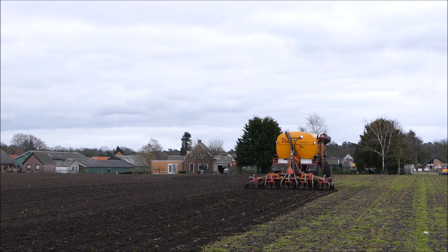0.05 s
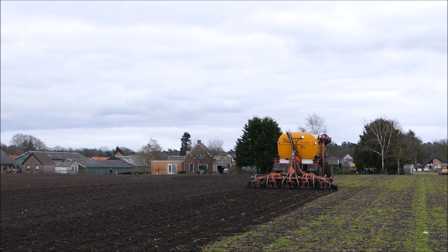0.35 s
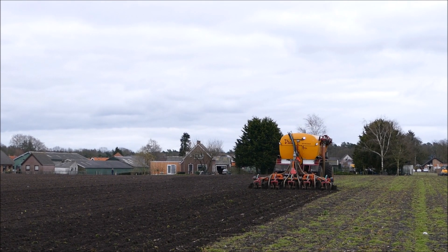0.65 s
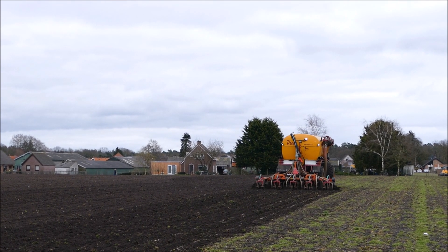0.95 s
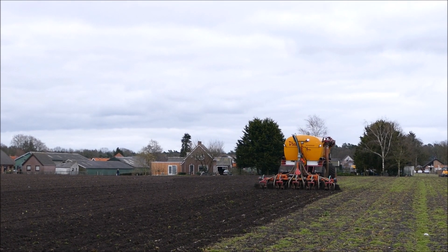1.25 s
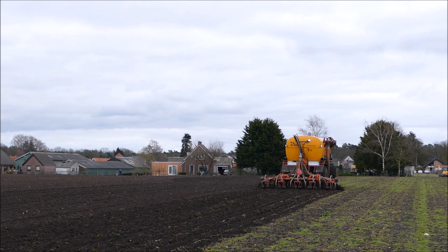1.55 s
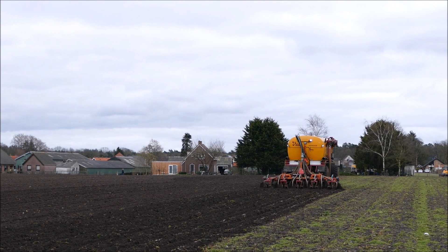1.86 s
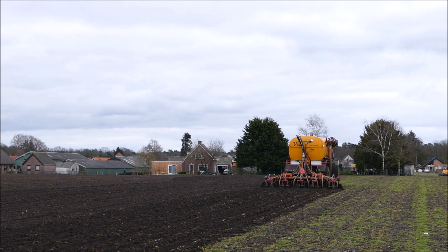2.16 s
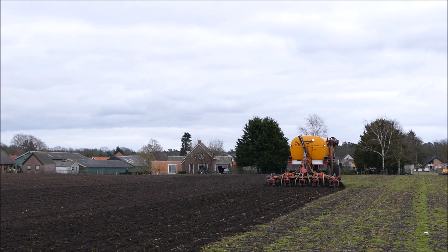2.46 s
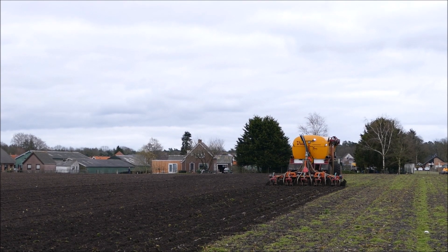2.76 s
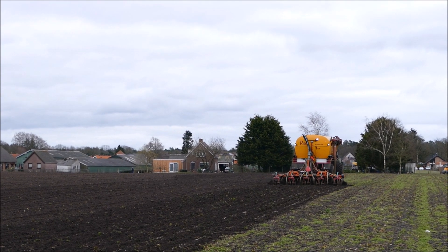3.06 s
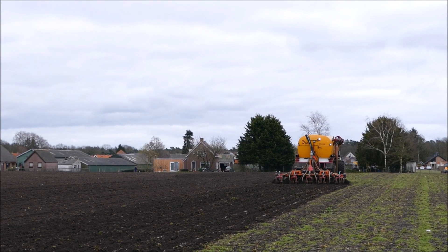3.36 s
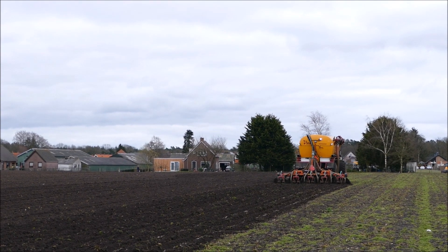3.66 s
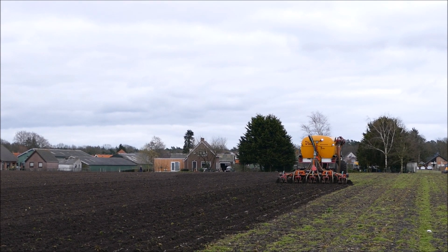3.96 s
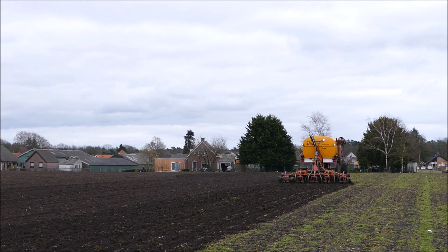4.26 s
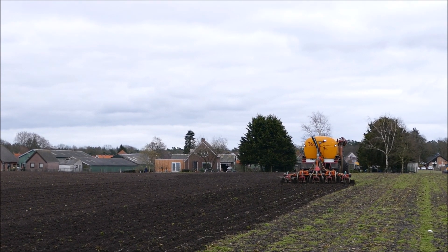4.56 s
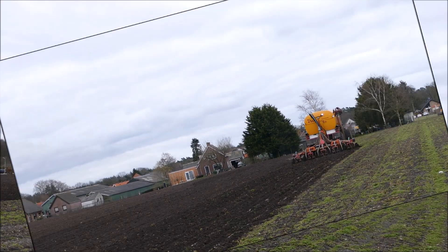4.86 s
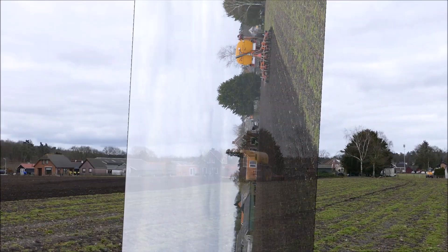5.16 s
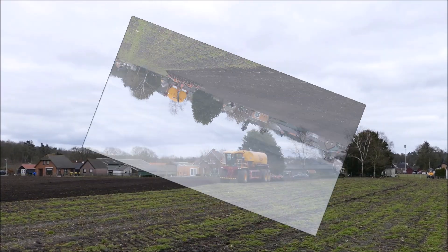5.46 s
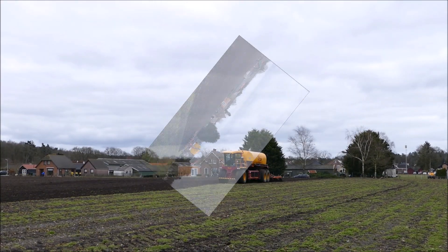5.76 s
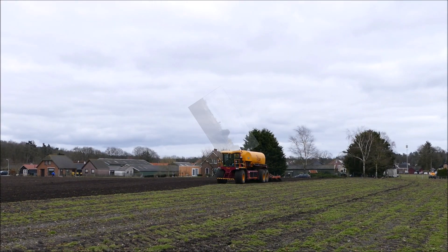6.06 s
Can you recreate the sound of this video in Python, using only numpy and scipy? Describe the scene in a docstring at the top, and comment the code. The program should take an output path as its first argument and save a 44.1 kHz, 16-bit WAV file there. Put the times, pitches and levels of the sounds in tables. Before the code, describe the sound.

A large diesel field machine moves away with a fluttering rush and hiss, then is heard approaching far off, squeaking.

```python
"""Slurry tanker working a field.

A self-propelled tanker crawls away, a little right of the microphone. Its six-cylinder diesel drones
under the fluttering rush of the cooling fan, and the injector tines hiss through the soil. With the
machine far off, the sound drops out for an instant, then fades over to it coming back, front on: the
hydraulic pumps whine and a turning part catches in short squeals. Light air stirs at the microphone."""
import sys
import numpy as np
from scipy.fft import rfft, irfft, next_fast_len
from scipy.io import wavfile
from scipy.ndimage import map_coordinates

SR = 44100
rng = np.random.default_rng(int(sys.argv[2]) if len(sys.argv) > 2 else 0)


def store_wav(level_fs):
    """Save 16-bit WAV to argv[1]."""
    pcm = np.round(np.clip(np.atleast_2d(level_fs), -1, 1) * 32767)
    wavfile.write(sys.argv[1], SR, pcm.T.astype(np.int16))


N = 273420

# Levels are relative. "Away" is the machine heard from behind, "back" is its return, front on.
# engine speed: t/s, firing rate/Hz
FIRING_RATE = [(0, 91.3), (.75, 91.6), (1.35, 91.3), (1.6, 90.05), (3, 89.9), (4.5, 89.6), (6.2, 89.7)]
# exhaust drone going away: t/s, level/dB
DRONE_AWAY = [(0, -38), (2.1, -40), (3.1, -43), (3.95, -44.5), (4.2, -49), (4.45, -47.5), (4.8, -53)]
# exhaust partials: multiples of the four-stroke cycle
EXHAUST_ORDERS = (9, 10, 11, 12, 14, 15, 16, 17, 18, 19, 21.5, 24, 25, 28, 30)
# the same partials: away level/dB, back level/dB
EXHAUST_LEVELS = [(-18.5, -16.5), (-40, -24), (-5, -13.5), (0, -1), (-13, -16), (-12.5, -28), (-19.5, -24),
                  (-10.5, -22), (-16.5, -22), (-36, -18.5), (-18.5, -24), (-24, -25), (-16, -18.5),
                  (-20.5, -20.5), (-25, -23)]
# diesel rumble from behind and from the front: f/Hz, level/dB
REAR_RUMBLE = [(20, -30), (45, -22), (70, -13.5), (110, -5.5), (150, 1), (190, 2), (265, 0), (330, -0.5),
               (420, -10.5), (540, -10.5), (750, -14.5), (1200, -53)]
FRONT_RUMBLE = [(60, -27), (110, -18), (150, -13), (200, -7), (300, -3), (360, -4.5), (440, -4.5),
                (520, -15), (680, -2.5), (820, -7), (1100, -23)]
# firing thud, rumble, fan roar and one pump tone, each sinking: level/dB, held until t/s, fall/(dB/s)
THUD_AWAY = (-48, 0.95, 3.35)
RUMBLE_AWAY = (-41, 1.44, 4.12)
ROAR_AWAY = (-33, 0.05, 3.61)
STRAIN_AWAY = (-53, 1.3, 15)

# fan going away: t/s, rush level/dB, hiss level/dB
FAN_AWAY = [(0, -27, -35), (0.5, -29, -35), (0.8, -27.5, -36), (1.1, -29, -33.5), (1.32, -28, -35),
            (1.95, -31, -34.5), (2.55, -35, -37.5), (3, -36, -41.5), (3.38, -39, -45), (3.75, -41.7, -47),
            (4.3, -43, -48), (4.9, -46, -53), (5.5, -48.5, -54)]
# low, middle and high bands of the fan's air noise: f/Hz, level/dB
ROAR_SPECTRUM = [(300, -15), (480, -7.5), (650, -5.5), (950, -1.5), (1250, -0.5), (1600, -1), (2400, -46)]
RUSH_SPECTRUM = [(800, -33), (1300, -12), (1600, -4), (1800, 0.8), (1960, -2), (2170, 2.5), (2420, -0.5),
                 (2950, -3.5), (3210, -10.5), (3380, -5.5), (3600, -16.5), (4100, -16.5), (5200, -31)]
HISS_SPECTRUM = [(2400, -13), (3300, -1), (3900, 0.5), (4500, 0), (5000, -3.5), (5800, -7.5), (6600, -14),
                 (7800, -16), (10000, -22)]
# shading of the rush from the front: f/Hz, gain/dB
FRONT_SHADE = [(1200, -6), (1900, -1), (2400, -3.5), (2900, -2), (4000, 1)]
# brief surges of the rush: t/s, half-length/s, gain/dB
RUSH_SURGES = [(0.603, 0.015, 3), (0.772, 0.013, -0.5), (1.278, 0.011, 1.5), (2.172, 0.03, 0.5),
               (3.016, 0.045, 0.5), (3.51, 0.03, 1.5), (3.98, 0.031, 0.5)]
# metal resonances of the fan housing: f/Hz, width/Hz, boost/dB
HOUSING_MODES = [(2980, 240, 2.5), (3360, 110, 1), (3856, 170, 5), (4100, 100, 3), (4487, 150, 6),
                 (4990, 160, 7.5), (5486, 175, 7), (6010, 170, 7), (6480, 230, 6), (7020, 110, 2),
                 (7300, 100, 3), (7580, 94, 4)]
# first three harmonics of the blade tone: away level/dB, back level/dB
BLADE_LEVELS = [(-25.5, -23), (-6, -17), (-24, -32)]

# tines going away: t/s, level/dB
TINES_AWAY = [(0, -44.5), (0.9, -47), (2.3, -44), (2.7, -47), (3.15, -60), (4.2, -60.5), (5.1, -65.5)]
# steel scraping through soil: f/Hz, level/dB
SCRAPE_SPECTRUM = [(4500, -36), (6500, 1), (7600, -2), (8300, -1.5), (9500, 1.5), (10500, -1.5),
                   (11500, -8), (12500, -12), (14200, -25)]
# pump whine going away: t/s, level/dB
WHINE_AWAY = [(0, -44.5), (0.7, -51.5), (2, -53.5), (2.35, -48.5), (2.7, -55.5), (3.3, -55), (5.1, -63.5)]
# pump partials: multiples of the firing rate
PUMP_ORDERS = (3.983, 6.92, 7.965, 8.03, 8.46, 9, 13.16, 17.3, 27.87)
# the same partials: away level/dB, back level/dB
PUMP_LEVELS = [(-7.5, -7.5), (-12, -6.5), (-1, -1), (-11.5, -22), (-20, -14), (-26, -19), (-5, -21),
               (-25, -17), (-15, -13)]
# squeals from the front, about six a second: start t/s, crest t/s, end t/s, crest level/dB
SQUEALS = [(5.335, 5.38, 5.425, -48), (5.475, 5.55, 5.6, -46.5), (5.595, 5.695, 5.752, -47.3),
           (5.775, 5.865, 5.912, -46), (5.94, 6.025, 6.09, -47), (6.085, 6.175, 6.23, -47)]

# air at the microphone: f/Hz, level/dB
BREEZE_SPECTRUM = [(20, -12), (45, -5), (75, 2.5), (130, 7), (200, 2), (330, -12), (900, -25)]
# the machine's place in the stereo image: f/Hz, left minus right level/dB
BALANCE = [(350, 0), (680, -1), (1240, -3.5), (2270, -3), (4150, -2.5), (7600, -.5)]
# likeness of its noise on the two sides: f/Hz, correlation
COHERENCE = [(30, 0.61), (80, 0.81), (170, 0.97), (350, 0.94), (600, 0.69), (1200, 0.85), (2200, 0.99),
             (4500, 0.93), (9000, 0.77)]
# narrow dips in the recorder's response: f/Hz, width/Hz, depth (0-1)
NOTCHES = [(567, 63, 0.72), (2666, 153, 1)]
# brief dropout: start t/s, end t/s
DROPOUT = (4.9002, 4.9335)

BLADES_PER_FIRING, STRAIN_PER_FIRING = 1.0605, 6.625  # fan and pump tones over the firing rate
DRONE_BACK_DB, THUD_BACK_DB, RUMBLE_BACK_DB, WHINE_BACK_DB = -43, -67, -52.5, -47.5
ROAR_BACK_DB, RUSH_BACK_DB, HISS_BACK_DB, TINES_BACK_DB = -55.5, -51.5, -61.5, -74.5
FADE_START_S, FADE_S, FADE_CURVE = 4.91, 1.13, 2.16
SQUEAL_LAG, WHINE_LAG, UNDERTONE_LAG = 0.75, 1.8, 2.8  # powers of the fade-in: higher arrives later
SQUEAL_HZ, SQUEAL_SAG, SQUEAL_JITTER = 1931, 0.023, 0.0075  # crest pitch; sag and jitter as shares of it
SQUEAL_EDGE_DB, SQUEAL_ROUGH_DB, SQUEAL_GRIP_S = 2.5, 2.0, 0.012
UNDERTONE_HZ, UNDERTONE_DB, UNDERTONE_JITTER = 1405, -55, 0.0168
BREEZE_DB, BREEZE_CALM_DB_PER_S = -60.5, 2.6
PUMP_LEAD_RAD = 0.31  # the whine reaches the right side first
DROPOUT_CLOSE_S, DROPOUT_OPEN_S, TOP_HZ = 0.002, 0.0002, 14500


def diesel(firings):
    """Six unequal cylinders drone at multiples of their cycle, over a rumble that puffs as each fires."""
    gains = crossfade(curves(DRONE_AWAY)[0] - 1.5, DRONE_BACK_DB)
    cycles = firings / 6
    drone = partials(EXHAUST_ORDERS, EXHAUST_LEVELS, cycles, gains,
                     flutter_db=1.7, flutter_hz=7, drift=0.0095)
    thud = distance_gain(receding(*THUD_AWAY), THUD_BACK_DB) * amp(0.61 * wobble(11)) * tone(firings)
    puffs = 1 + 0.15 * np.cos(2 * np.pi * firings)
    away, back = crossfade(receding(*RUMBLE_AWAY), RUMBLE_BACK_DB)
    rumble = amp(wobble(8)) * (away * noise(REAR_RUMBLE, puffs) + back * noise(FRONT_RUMBLE, puffs))
    return drone + thud + rumble


def fan(firings):
    """Belt-driven blades chop the cooling air; turbulence roughens the rush, duller from the front."""
    rush_db, hiss_db = curves(FAN_AWAY)
    blade_phase = 2 * np.pi * BLADES_PER_FIRING * firings
    slap = np.sin(blade_phase) + 0.4 * np.sin(2 * blade_phase)  # a quick rise, a slower fall
    chop = amp(1.05 * slap + 0.39 * wobble(350) + 0.16 * wobble(35))
    roar = distance_gain(receding(*ROAR_AWAY), ROAR_BACK_DB) * noise(ROAR_SPECTRUM, chop)
    away, back = crossfade(rush_db + 1.5, RUSH_BACK_DB)
    from_behind = housing(noise(RUSH_SPECTRUM, chop))
    from_front = unit(filtered(noise(RUSH_SPECTRUM, chop), lambda hz: amp(along(FRONT_SHADE, hz))))
    t = np.arange(N) / SR
    surge_db = sum(db * np.exp(-((t - at_s) / half_s) ** 2) for at_s, half_s, db in RUSH_SURGES)
    rush = amp(surge_db + 0.17 * wobble(18)) * (away * from_behind + back * from_front)
    hiss_gain = distance_gain(hiss_db - 0.22, HISS_BACK_DB) * amp(0.41 * wobble(16))
    hiss = hiss_gain * housing(noise(HISS_SPECTRUM, chop))
    return amp(0.18 * wobble(7.5)) * (roar + rush + hiss)


def housing(air):
    """Each resonance of the metal fan housing lifts a narrow band of the air noise."""
    boost_db = lambda f: sum(db / (1 + (2 * (f - hz) / width) ** 2) for hz, width, db in HOUSING_MODES)
    return unit(filtered(air, lambda f: amp(boost_db(f))))


def blade_hum(firings):
    """The fan's second harmonic lies just above the drone and beats with it about ten times a second."""
    harmonics = np.arange(len(BLADE_LEVELS)) + 1
    gains = crossfade(curves(DRONE_AWAY)[0] - 1.7, DRONE_BACK_DB)
    return partials(harmonics, BLADE_LEVELS, BLADES_PER_FIRING * firings, gains,
                    flutter_db=1.5, flutter_hz=3, drift=0.025)


def tines():
    """Steel tines drag through crumbling soil: a fine-grained hiss that hushes halfway through."""
    crumbs = amp(1.3 * wobble(600) + 0.64 * wobble(20))
    scrape = bodywork_echo(noise(SCRAPE_SPECTRUM, crumbs), delay_s=0.001865, share=0.27)
    return distance_gain(curves(TINES_AWAY)[0], TINES_BACK_DB) * scrape


def bodywork_echo(x, delay_s, share):
    """A slightly longer path to the microphone, off the bodywork, ripples the treble."""
    return unit(filtered(x, lambda hz: 1 + share * np.exp(-2j * np.pi * hz * delay_s)))


def hydraulics(firings):
    """The drive pumps whine in step with the engine; one strained tone dies away as it slows."""
    away, back = crossfade(curves(WHINE_AWAY)[0], 0)
    gains = away, amp(WHINE_BACK_DB) * back ** WHINE_LAG
    strain = amp(receding(*STRAIN_AWAY) + 2.4 * wobble(11.8)) * tone(STRAIN_PER_FIRING * firings)
    whine = partials(PUMP_ORDERS, PUMP_LEVELS, firings, gains, flutter_db=0.7, flutter_hz=14, drift=0.066)
    return strain + whine


def squeals():
    """A turning part catches, squeals in an arch of pitch and level and lets go, over a hoarser tone."""
    t = np.arange(N) / SR
    arches = np.zeros(N)
    for start_s, crest_s, end_s, crest_db in SQUEALS:
        sag = np.interp(t, [start_s, crest_s, end_s], [1, 0, 1])
        grip = np.clip(np.minimum(t - start_s, end_s - t) / SQUEAL_GRIP_S, 0, 1)
        hz = SQUEAL_HZ * (1 - SQUEAL_SAG * sag + SQUEAL_JITTER * wobble(200))
        arches += grip * amp(crest_db - SQUEAL_EDGE_DB * sag) * tone(np.cumsum(hz) / SR)
    undertone = tone(np.cumsum(UNDERTONE_HZ * (1 + UNDERTONE_JITTER * wobble(120))) / SR)
    _, back = crossfade(0, 0)
    squeal_gain = back ** SQUEAL_LAG * amp(SQUEAL_ROUGH_DB * wobble(110))
    undertone_gain = back ** UNDERTONE_LAG * amp(UNDERTONE_DB + 2.4 * wobble(40))
    return squeal_gain * arches + undertone_gain * undertone


def breeze():
    """Light air stirs at each side of the microphone on its own, and settles."""
    spectrum = [*BREEZE_SPECTRUM, (SR / 8, -120)]
    air = filtered(rng.standard_normal((2, N)), lambda hz: amp(along(spectrum, hz)))
    return amp(BREEZE_DB - BREEZE_CALM_DB_PER_S * np.arange(N) / SR + 1.5 * wobble(7)) * unit(air)


def crossfade(away_db, back_db):
    """Gains of the leaving and of the oncoming machine as one gives way to the other."""
    share = np.clip((np.arange(N) / SR - FADE_START_S) / FADE_S, 0, 1) ** FADE_CURVE
    return amp(away_db) * np.sqrt(1 - share), amp(back_db) * np.sqrt(share)


def distance_gain(away_db, back_db):
    """One gain for a layer that sounds alike from behind and from the front."""
    return np.hypot(*crossfade(away_db, back_db))


def receding(start_db, held_s, fall_db_per_s):
    """A level in dB that holds, then sinks steadily."""
    return start_db - fall_db_per_s * np.maximum(np.arange(N) / SR - held_s, 0)


def partials(orders, levels, turns, gains, flutter_db, flutter_hz, drift):
    """Tones locked to a shaft, balanced differently behind and in front; drift is in cycles."""
    away, back = gains
    out = np.zeros(N)
    for order, (away_db, back_db) in zip(orders, levels):
        gain = np.hypot(away * amp(away_db), back * amp(back_db))
        flutter = amp(flutter_db * wobble(flutter_hz))
        out += gain * flutter * tone(order * turns + drift * wobble(flutter_hz))
    return out


def noise(spectrum, gate):
    """Mid-side noise as left and right, rms 1: gated, then coloured, with steep band edges."""
    closed = [(spectrum[0][0] / 2, -120), *spectrum, (spectrum[-1][0] * 2, -120)]
    spread = lambda hz: np.arccos(np.clip(along(COHERENCE, hz), -1, 1)) / 2
    colour = lambda hz: amp(along(closed, hz)) * [np.cos(spread(hz)), np.sin(spread(hz))]
    mid, side = filtered(gate * rng.standard_normal((2, N)), colour)
    return unit(np.array([mid + side, mid - side]))


def tone(turns):
    """A sine of rms 1 that starts anywhere in its cycle."""
    return np.sqrt(2) * np.sin(2 * np.pi * (turns + rng.random()))


def wobble(rate):
    """A smooth random curve, rate knots a second."""
    return map_coordinates(rng.standard_normal(int(N * rate / SR) + 4), [np.arange(N) * rate / SR])


def filtered(x, response):
    """x through a complex frequency response."""
    size = next_fast_len(N + SR // 2)
    return irfft(rfft(x, size) * response(np.fft.rfftfreq(size, 1 / SR)), size)[..., :N]


def curves(rows):
    """One value per sample for each column after the time."""
    times, *columns = np.transpose(rows)
    return [np.interp(np.arange(N) / SR, times, column) for column in columns]


def along(points, hz):
    """Interpolate rows of f/Hz, value on a log frequency axis."""
    f, values = np.transpose(points)
    return np.interp(np.log(hz + 1), np.log(f + 1), values)


def amp(db):
    """Decibels to gain."""
    return 10 ** (np.asarray(db) / 20)


def unit(x):
    """Scale to rms 1."""
    return x / np.sqrt(np.mean(x ** 2) + 1e-20)


def scene():
    """The machine out on the field, a little to the right; only its bass reaches both sides equally."""
    firings = np.cumsum(curves(FIRING_RATE)[0]) / SR
    whine = filtered(hydraulics(firings), lambda hz: np.exp(1j * PUMP_LEAD_RAD * np.array([[-1], [1]]) / 2))
    machine = diesel(firings) + blade_hum(firings) + fan(firings) + tines() + whine + squeals()
    placed = filtered(machine, lambda hz: amp(np.outer([1, -1], along(BALANCE, hz)) / 2))
    return placed + breeze()


def record(dry):
    """The recorder: two narrow dips and a band limit; as the scene changes the sound drops out for an instant,
    going softly and returning at once."""
    dips = lambda f: np.prod([1 - depth * 1j * f * width / (hz * hz - f * f + 1j * f * width)
                              for hz, width, depth in NOTCHES], axis=0)
    t = np.arange(N) / SR
    start_s, end_s = DROPOUT
    closing = np.clip(0.5 + (start_s - t) / DROPOUT_CLOSE_S, amp(-40), 1)
    opening = np.clip((t - end_s) / DROPOUT_OPEN_S, 0, 1)
    return filtered(np.maximum(closing, opening) * filtered(dry, dips), lambda hz: hz < TOP_HZ)


dry = scene()
out = record(dry)
store_wav(out)
```